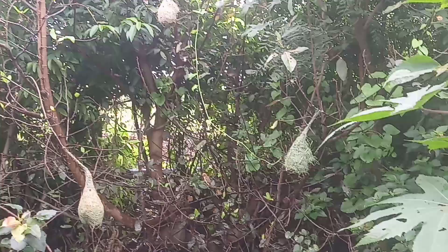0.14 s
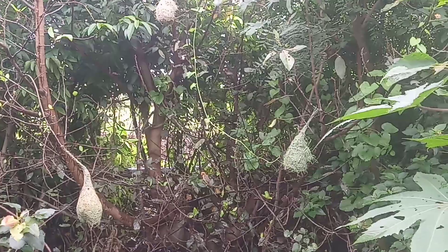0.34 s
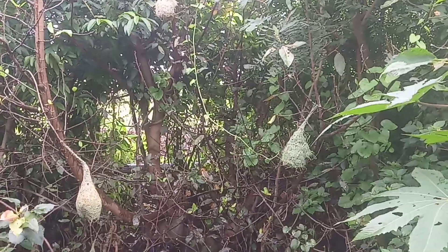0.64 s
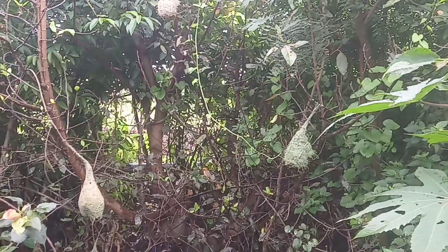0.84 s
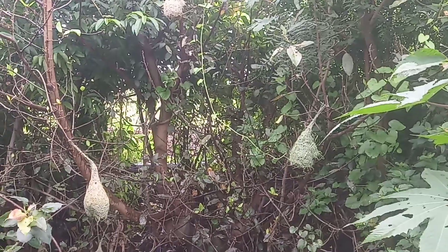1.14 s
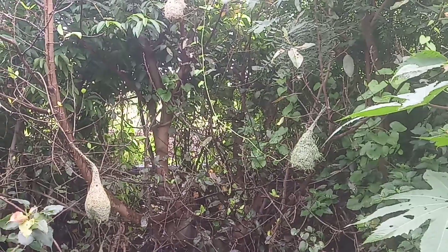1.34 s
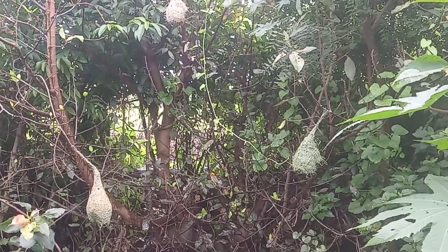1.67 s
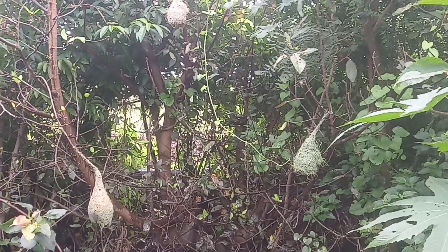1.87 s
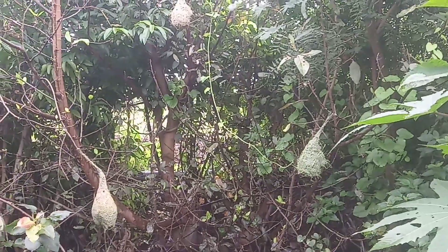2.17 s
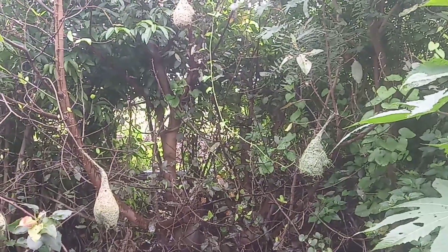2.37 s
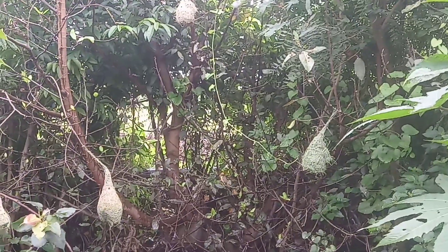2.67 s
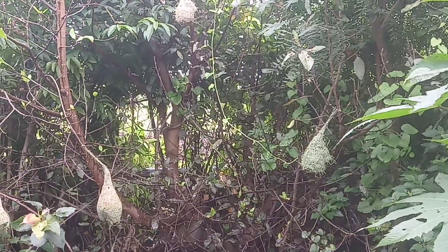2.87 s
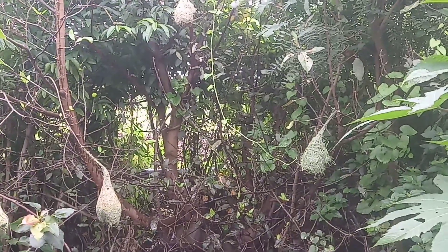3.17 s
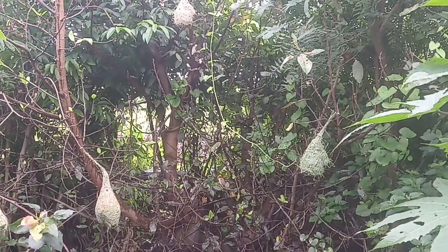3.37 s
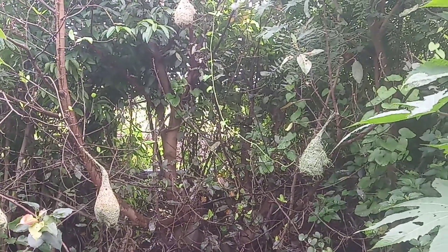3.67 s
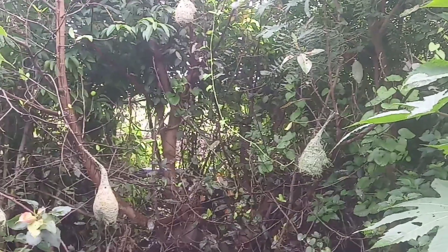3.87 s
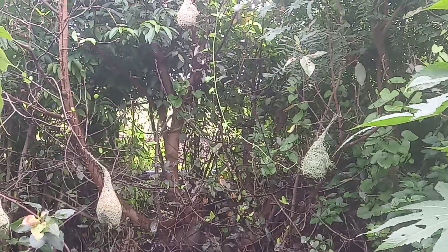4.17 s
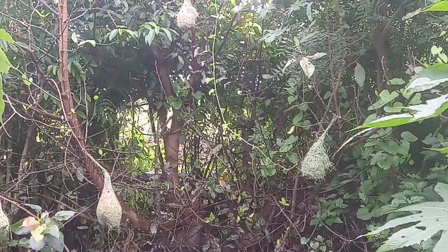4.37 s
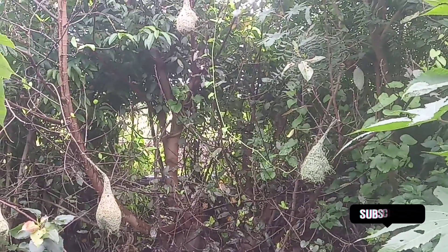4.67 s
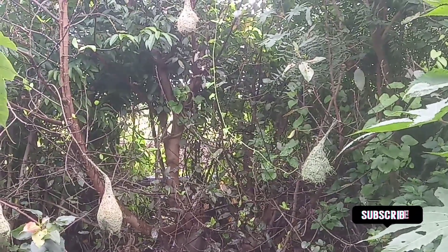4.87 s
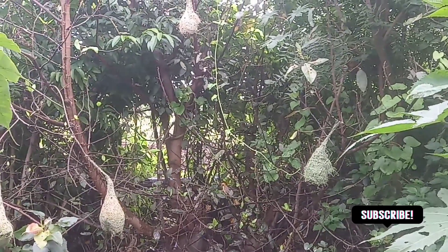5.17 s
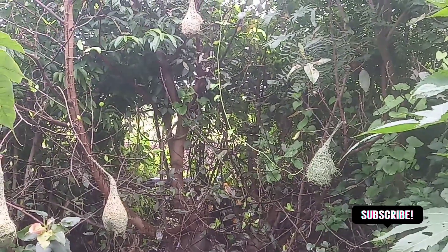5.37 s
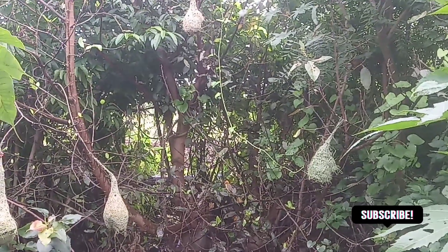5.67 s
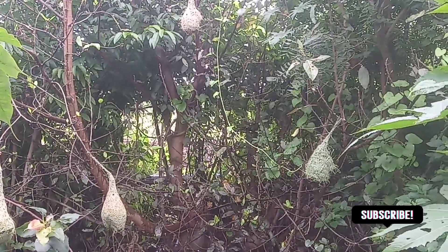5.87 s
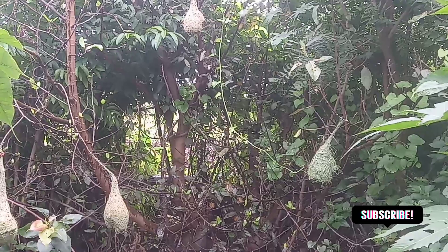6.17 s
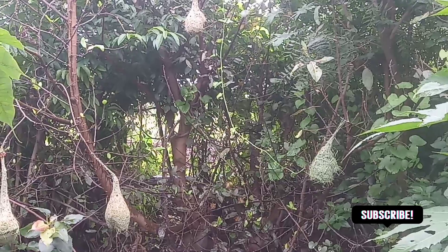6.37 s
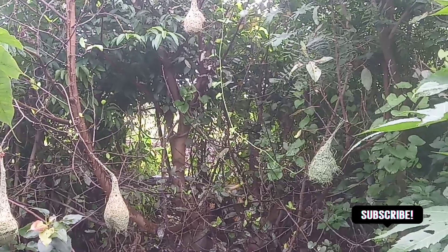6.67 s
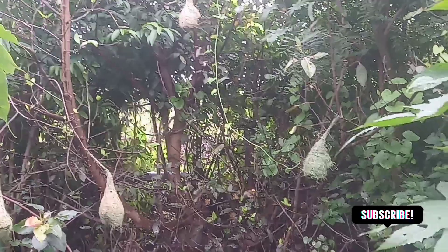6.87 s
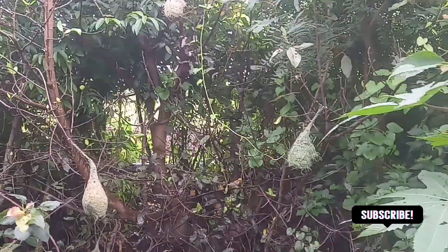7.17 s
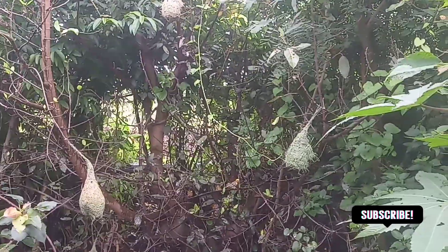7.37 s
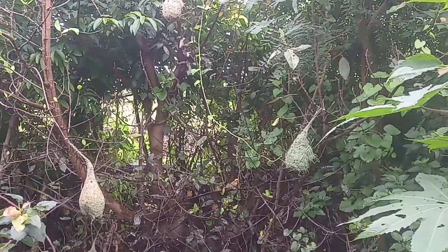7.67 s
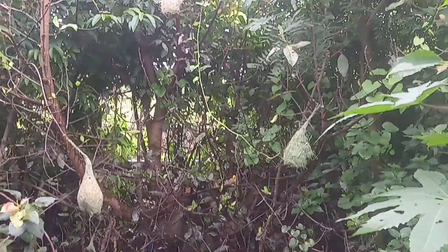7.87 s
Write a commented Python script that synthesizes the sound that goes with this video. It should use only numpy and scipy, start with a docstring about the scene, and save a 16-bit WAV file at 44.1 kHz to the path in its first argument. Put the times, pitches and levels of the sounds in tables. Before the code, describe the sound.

A leafy outdoor thicket with weaver birds, heard through a handheld mono recorder. High crickets trill in alternating bouts of about a third of a second, over constant thin cicada buzz, faint hiss and rumble. A close bird gives very short, bright chirps, flicking up then falling, some raspier: at 0, 0.2 and 0.5 seconds, then 1.5, 2.1, 3.0, 3.7, a pair near 4.8, 5.6, and a cluster at 7.1, 7.3 and 7.6. A lower nasal neighbour scolds near 1.1, 3.5, 5.5 and 6.7. Soft rising notes repeat about four times a second at 0.1-0.9, 3.2-4.8 and 6.6-8, each series climbing. Distant whistles glide throughout; a faint flock haze is strongest at first. Leaves scatter calls briefly. A soft low bump comes at 1.3, a small click-like knock at 4.3.

```python
"""In a thicket of weaver birds: one bird close to the microphone chirps, sweeping up and falling with buzzy partials.
A neighbour scolds in a lower nasal voice, one bird repeats a rising note; others whistle far off as gliding sines,
and a far flock is a haze of tiny notes. Two crickets in bouts and steady cicadas are banded, throbbing noise.
Leaves and trunks scatter the bird calls into a short tail of decaying noise; rumble and hiss lie under it all,
and the hand-held recorder is knocked a few times, each knock a brief ringing sine."""
import sys
import numpy as np
from scipy import signal
from scipy.fft import rfft, irfft
from scipy.io import wavfile
from scipy.ndimage import uniform_filter1d, map_coordinates

SR = 44100
rng = np.random.default_rng(int(sys.argv[2]) if len(sys.argv) > 2 else 0)


def master(y):
    """Save y as 16-bit WAV."""
    cut = np.clip(np.atleast_2d(y).T, -1, 1)
    pcm = np.round(cut * 32767)  # scale
    wavfile.write(sys.argv[1], SR, pcm.astype(np.int16))


N = 353682

# Close bird's chirps: top_s, top_hz, fall_s, level_db (ahead of the throat), start_db (at the top, against level);
# first_db, third_db, upper_db (4th-5th partial), shrill_db (6th and up), all against the throat;
# rasp_db, echo_db (sent to the leaves, against the direct call)
CHIRPS = [(.006, 2122, .049, -35, -4, 7, 0.5, 2.5, -13, -13, -2),
          (.199, 2121, 0.057, -50, 0.5, 9.8, 9, 8, -4, -6, 6),
          (.489, 2062, 0.064, -36.5, 3, 4.6, -2, 3, -1.5, -33, 2.5),
          (1.509, 2088, 0.054, -47.5, -3.5, 9.9, 8, -2, 4, -5.5, 2),
          (2.062, 2026, .064, -40.5, -1.5, 7.9, 0, 3.5, -2, -24, 2),
          (2.953, 2069, 0.058, -36.5, -0.5, 4.1, 2, -1.5, 0, -28, 0),
          (3.704, 2036, 0.059, -39, -2.5, 7.3, 2, 2.5, 2.5, -27, 1.5),
          (4.716, 2102, 0.066, -44.5, 2, 6.5, 3, 3, 0, -22, 8),
          (4.857, 2153, .06, -53, 1, 13, 6.5, 7.5, -7, -12, 7),
          (5.645, 2107, .066, -39.5, -0.5, 7.3, 2.5, 5, 0, -28, 3.5),
          (7.116, 2142, 0.063, -35.5, -1.5, 3.5, 5.5, -1.5, 5, -16.5, 1.5),
          (7.322, 2057, .052, -40, -4, 11.2, 2, 2, 0, -15, 1.5),
          (7.56, 2074, .06, -38.5, -4.5, 6.6, 3, 6.5, -4, -32, 3)]
# Close bird's throat gain: pitch_hz, gain_db
CHIRP_THROAT = [(1000, -62), (1450, -45), (2050, -22), (2900, -5.5), (4150, 1.5), (5200, -7), (6200, -14.5),
                (8300, -32.5), (10400, -27), (12500, -36.5), (15500, -55.5)]
# Neighbour's scolds: start_s, held_hz, length_s, opening_db, held_db, last_db (all ahead of the throat)
SCOLDS = [(1.11, 1075, 0.14, -60, -59.5, -58), (3.531, 1049, 0.147, -60, -60, -56),
          (5.479, 1052, .15, -67.5, -63, -56.5), (6.709, 1053, 0.15, -61.5, -60, -58)]
# Pitch course of a scold: share_of_length [0-1], pitch_ratio [to held_hz]
SCOLD_GLIDE = [(0, 1.33), (.08, 1.31), (.13, 1.05), (.3, 1.01), (.62, .98), (.78, .9), (1, .75)]
# Neighbour's throat gain: pitch_hz, gain_db
SCOLD_THROAT = [(1050, -37.5), (1500, -28.5), (2100, -0.5), (2800, -5.5), (3200, 4), (4300, 2.5),
                (5400, -16), (8000, -29.5)]
# Repeated rising note: start_s, length_s, middle_hz, level_db (before the wavering)
REPEATS = [(.106, 0.11, 2300, -80.5), (0.343, 0.12, 2366, -73.5), (0.624, .09, 2480, -76.5),
           (.871, 0.082, 2578, -70.5), (3.164, 0.071, 2130, -75), (3.42, .11, 2190, -76.5),
           (3.72, 0.078, 2260, -71), (3.969, 0.1, 2320, -70), (4.228, 0.11, 2470, -69.5),
           (4.495, 0.1, 2584, -70.5), (4.748, 0.12, 2800, -62.5), (6.637, 0.1, 2160, -81),
           (6.912, 0.082, 2230, -71.5), (7.185, 0.08, 2270, -68.5), (7.437, 0.12, 2270, -68),
           (7.695, 0.056, 2315, -66), (7.946, .078, 2380, -85.5)]
# Distant whistles: start_s, length_s, early_hz, middle_hz, late_hz, level_db (before the wavering)
WHISTLES = [(.699, 0.11, 3290, 3130, 3000, -84), (0.746, 0.094, 3550, 3690, 3550, -81.5),
            (0.923, 0.085, 3800, 3710, 3660, -73.5), (1.105, 0.46, 1400, 1676, 1486, -76.5),
            (1.298, .16, 1980, 2050, 2070, -77), (1.365, 0.25, 2755, 2540, 2630, -82),
            (1.837, 0.37, 1357, 1526, 1364, -81.5), (1.98, .16, 2290, 2320, 2290, -76),
            (2.225, 0.036, 2460, 2525, 2480, -76.5), (2.36, 0.046, 2490, 2450, 2490, -80.5),
            (2.68, 0.27, 2024, 1982, 1953, -78), (2.77, 0.22, 790, 780, 790, -92),
            (3.034, 0.079, 2750, 2710, 2620, -86), (3.352, 0.32, 1974, 2056, 2040, -72),
            (4.003, 0.1, 2110, 1930, 1980, -88), (4.37, 0.067, 2570, 2660, 2640, -84),
            (4.374, 0.11, 2020, 1994, 1974, -79.5), (5.144, 0.092, 3200, 3260, 3280, -83),
            (5.172, .13, 1980, 1980, 1950, -89), (5.23, .1, 2620, 2610, 2600, -88),
            (5.247, 0.13, 3980, 4150, 3900, -73), (5.288, .048, 3450, 3565, 3620, -73.5),
            (5.717, 0.14, 2015, 1990, 1910, -81), (5.726, 0.19, 1597, 1666, 1600, -89.5),
            (6.04, 0.095, 2180, 1940, 1780, -87), (6.2, .087, 1830, 1770, 1836, -88),
            (6.308, .054, 4000, 4070, 3870, -86), (6.9, 0.078, 3210, 3230, 3120, -76)]
# Loudness course of the far flock, before its shares in the mix: time_s, level_db
FLOCK_COURSE = [(0, -72), (.3, -74.5), (.7, -77), (.86, -90), (.95, -77), (1.47, -80), (1.82, -92),
                (2.4, -101), (2.6, -90.5), (3.2, -98), (4.15, -94.5), (5.05, -88), (5.35, -87),
                (5.45, -95.5), (6.18, -91), (6.58, -87.5), (7.0, -86), (8.02, -90)]
# Bouts of the lower and the higher cricket: start_s, length_s, level_db (before the wing bands' own levels)
LOW_BOUTS = [(0, 0.48, -63.5), (1.15, 0.32, -64.5), (1.82, .36, -65.5), (2.58, 0.29, -66), (3.3, .3, -64.5),
             (3.88, .31, -65.5), (4.55, 0.39, -65.5), (5.17, 0.28, -64), (5.76, 0.271, -64.5),
             (6.47, 0.33, -65), (7.15, .33, -63.5), (7.82, 0.33, -65.5)]
HIGH_BOUTS = [(.1, 0.28, -61), (.55, 0.39, -71), (.89, 0.32, -61.5), (1.5, .32, -63.5), (2.21, 0.31, -63),
              (2.91, 0.35, -62.5), (3.6, 0.3, -61), (4.24, .35, -63.5), (4.95, .32, -62), (5.52, 0.37, -63),
              (6.24, 0.36, -62), (6.9, 0.37, -61.5), (7.58, 0.35, -62)]
# Wing bands of each cricket: pitch_hz, width_hz, strokes_per_s, level_db, start_db (at bout start, against level)
LOW_WINGS = [(4710, 140, 51, -2, -3), (4973, 210, 51, -3, -3), (4420, 130, 61, -18, -6)]
HIGH_WINGS = [(4924, 120, 62, -4.5, 0.5), (5080, 130, 57, -2.5, -13.5), (5410, 200, 87, -14.5, -14)]
# Cicada bands: pitch_hz, width_hz, level_db (before the swelling)
CICADAS = [(5874, 300, -68), (6186, 323, -64), (6493, 398, -64), (6760, 400, -75)]
# Knocks on the recorder: start_s, ring_hz (once settled), t60_s, peak_db
KNOCKS = [(0.271, 75.3, 0.35, -63), (.56, 78, 0.14, -71), (1.268, 68, 0.14, -49),
          (4.3333, 570, 0.012, -40.5), (4.334, 3470, .01, -59), (7.739, 590, 0.013, -63)]
# Shape of the rumble and hiss, overall level set by AIR_DB: pitch_hz, gain_db
AIR_SHAPE = [(20, -16.5), (40, -23), (68, -3.5), (130, -6), (250, -14.5), (450, -22.5), (1000, -27.5),
             (2000, -26), (4000, -27), (5300, -31), (7300, -27.5), (9000, -31.5), (12000, -33),
             (16000, -31)]
# Fade of the third, fourth, fifth and higher partials: multiples of OFF_TOP_DB
FADE_STEPS = (2.22, 3.2, 2.5, 3.2)

# Close bird
SWEEP_S, SWEEP_FROM_HZ = .024, 900
SWEEP_DB = -22  # start of the sweep against its level
USUAL_DB, SWEEP_TOP_DB, SWEEP_FOLLOWS = -40, -48.5, 0.4  # sweep of a chirp at USUAL_DB; dB per dB of level
SWEEP_RASP = .35  # depth of the rasp in the sweep
SWEEP_THIN = 5.5  # the first partial is faint low in the sweep (multiple of its fade)
FALL_BEND = 3.2  # power of the steepening fall
OFF_TOP_DB = -16.5  # fade per octave below the top, taken in multiples; a fifth as much during the sweep
LAST_HZ, LAST_HZ_PER_RASP = 1456, 295  # a raspy chirp breaks off higher
LATE_DB, LATE_DB_PER_RASP = -8.5, 17  # end of the fall against the level; raspy chirps hold on
RASP_HZ = 615  # cutoff of the noise that shakes the partials
# Repeated note: above EASY_HZ it arches over (Hz per Hz)
RISE_IN_HZ, RISE_OUT_HZ, EASY_HZ, ARCH_IN, ARCH_OUT = 78, 70, 2278, .25, .55
FLOCK_LOW_HZ, FLOCK_HIGH_HZ = 2872, 4600
# Insects
SWELL_SHARE, BOUT_EDGE_S = 0.56, 0.066  # share of a bout spent swelling; length of its edges
CHORUS_DB = -83.5  # far crickets, heard between bouts
START_FLAT = .012  # a bout starts this share under its pitch and glides up as it swells
OVERTONE_HZ, OVERTONE_WIDTH_HZ, OVERTONE_DB = 9454, 440, -85
# Place and recorder
THICKET_T60_S, THICKET_DB, THICKET_DULL_HZ = .2, -2.5, 6500
FAR_TREES_T60_S, FAR_TREES_DB = 0.39, -26.5
AIR_DB = -78.5
TOP_HZ = 15750  # top of the recorder's range


def undb(db):
    """Decibels to gain."""
    return 10 ** (np.asarray(db) / 20)


def level(x, db):
    """Scale to an RMS level."""
    return x * undb(db) / np.sqrt(np.mean(x ** 2))


def colour(table, hz):
    """Gain of a pitch_hz, gain_db table, read along log frequency."""
    table_hz, table_db = np.transpose(table)
    return undb(np.interp(np.log(hz), np.log(table_hz), table_db))


def lowpass(x, order, hz):
    """Remove the treble above a cutoff."""
    return signal.sosfilt(signal.butter(order, hz, fs=SR, output="sos"), x)


def band(x, hz, width_hz):
    """Steep resonance."""
    edges = [hz - width_hz / 2, hz + width_hz / 2]
    return signal.sosfilt(signal.butter(4, edges, "band", fs=SR, output="sos"), x)


def walk(rate):
    """Random drift of RMS 1, from twice-smoothed steps at `rate` per second."""
    k = int(SR / rate)
    steps = np.repeat(rng.standard_normal(N // k + 1), k)
    return level(uniform_filter1d(uniform_filter1d(steps, k), k)[:N], 0)


def add(track, start, sound):
    """Place a sound on a track, trimmed at both ends of it."""
    i = int(start * SR)
    sound = sound[max(-i, 0):N - i]
    track[max(i, 0):max(i, 0) + len(sound)] += sound


def glide_sine(hz):
    """Sine that follows a pitch curve."""
    return np.sin(2 * np.pi * np.cumsum(hz) / SR)


def voice(hz, throat, partial_db, rasp, rasp_climb=0.43):
    """Partials of a gliding pitch, weighted by the throat; rasp shakes their strength and spreads them into noise."""
    out = 0
    for k, db in enumerate(partial_db, 1):
        shake = level(lowpass(rng.standard_normal(len(hz)), 4, RASP_HZ), 0)
        roughness = 1 + rasp * (k - 1) ** rasp_climb * shake  # the first partial stays smooth when k - 1 is 0
        gain = colour(throat, k * hz) * undb(db) * (k * hz < TOP_HZ)
        out = out + gain * roughness * glide_sine(k * hz)
    return np.sqrt(2) * out


def chirps():
    """Close bird: a quick sweep up, a held top, a steepening fall; returns direct sound and what goes to the leaves."""
    near, far = np.zeros(N), np.zeros(N)
    for top_s, top, fall, middle, start_db, first, third, upper, shrill, rasp_db, echo_db in CHIRPS:
        last = LAST_HZ + LAST_HZ_PER_RASP * undb(rasp_db)
        late = middle + LATE_DB + LATE_DB_PER_RASP * undb(rasp_db)
        sweep = SWEEP_TOP_DB + SWEEP_FOLLOWS * (middle - USUAL_DB)
        t = np.arange(-SWEEP_S, fall + 0.0029, 1 / SR)
        rise = top - (top - SWEEP_FROM_HZ) * np.clip(-t / SWEEP_S, 0, 1) ** 1.1
        # the top sags slowly before it breaks away
        u = np.clip(t / fall, 0, 1)
        hz = rise - (top - last) * (.12 * u + .88 * u ** FALL_BEND)
        db = np.interp(t, [-SWEEP_S, -.019, -.003, .005, 0.54 * fall, 0.98 * fall, fall + 0.00093],
                       [sweep + SWEEP_DB, sweep - 4, sweep + 4, middle + start_db, middle, late, late - 25])
        fade = OFF_TOP_DB * np.log2(top / hz) * np.where(t > 0, 1, .2)
        # the first partial gains through the fall, while the third and up fade
        first_db = first - fade * np.where(t > 0, 1, -SWEEP_THIN)
        middle_dbs = [base + step * fade for base, step in zip([third, upper, upper], FADE_STEPS)]
        shrill_dbs = [shrill + FADE_STEPS[3] * fade] * 3
        rasp = np.interp(t, [-.005, .002], [SWEEP_RASP, undb(rasp_db)])
        call = undb(db) * voice(hz, CHIRP_THROAT, [first_db, 0, *middle_dbs, *shrill_dbs], rasp)
        add(near, top_s - SWEEP_S, call)
        add(far, top_s - SWEEP_S, undb(echo_db) * call)
    return near, far


def scolds():
    """Neighbour's lower, nasal calls: a harsh high opening, a held note, a droop."""
    out = np.zeros(N)
    for start, held, length, opening, steady, last in SCOLDS:
        u = np.arange(0, length, 1 / SR) / length
        hz = held * np.interp(u, *np.transpose(SCOLD_GLIDE))
        db = np.interp(u, [0, .02, .12, .25, .55, .92, 1],
                       [opening - 25, opening, opening - 6, steady - 3, steady, last, last - 20])
        rasp = np.interp(u, [0, .15, .3, 1], [.3, .25, .1, .08])
        # only the third partial carries through the droop
        droop = np.clip(1 - hz / held, 0, 1)
        upper = -6 * np.minimum(u * 5, 1) - 90 * droop
        partials = [-40 * droop, -40 * droop, 20 * droop] + [upper] * 3
        add(out, start, undb(db) * voice(hz, SCOLD_THROAT, partials, rasp, rasp_climb=1.4))
    return out


def repeats():
    """The repeated note as whistle rows: it rises, and arches over when pitched high."""
    start, length, hz, db = np.transpose(REPEATS)
    strain = np.maximum(hz - EASY_HZ, 0)
    early = hz - RISE_IN_HZ - ARCH_IN * strain
    late = hz + RISE_OUT_HZ - ARCH_OUT * strain
    return list(zip(start, length, early, hz, late, db))


def whistles():
    """Pure notes on an arched glide, wavering on the way through the leaves; high notes break up more."""
    low, high = np.zeros(N), np.zeros(N)
    for start, length, early, middle, late, db in WHISTLES + repeats():
        u = np.arange(0, length, 1 / SR) / length
        v = np.clip((u - .5) / .35, -1.2, 1.2)
        # parabola through the early, middle and late pitch
        hz = middle + v * (late - early) / 2 + v ** 2 * ((late + early) / 2 - middle)
        note = undb(db) * np.sqrt(2) * np.sin(np.pi * u) ** 0.6 * glide_sine(hz)
        add(high if middle > 3000 else low, start, note)
    return low * undb(4 * walk(90)) + high * walk(250)


def flock(count=500):
    """Many faint 25 ms notes gliding either way, too far off to tell apart."""
    out = np.zeros(N)
    for when, pitch, glide, size in rng.random((count, 4)):
        u = np.arange(0, .025, 1 / SR) / .025
        hz = FLOCK_LOW_HZ + (FLOCK_HIGH_HZ - FLOCK_LOW_HZ) * pitch + 500 * (glide - .6) * u
        add(out, when * N / SR, undb(-14 * size) * np.sin(np.pi * u) * glide_sine(hz))
    return level(out, 0) * undb(np.interp(np.arange(N) / SR, *np.transpose(FLOCK_COURSE)))


def strokes(rate, depth):
    """Scraping noise that throbs once per wing stroke, at a drifting rate."""
    return rng.standard_normal(N) * (1 + depth * glide_sine(rate * (1 + .08 * walk(12))))


def cricket(bouts, wings):
    """Each bout swells and glides up, holds, and dies away; every wing band swells by its own amount."""
    t, on, early = np.arange(N) / SR, np.zeros(N), np.ones(N)
    for start, length, db in bouts:
        edge = np.minimum(t - start, start + length - t) / BOUT_EDGE_S
        on += undb(db) * np.clip(edge + .5, 0, 1) ** 2
        unswelled = np.clip(1 - (t - start) / (SWELL_SHARE * length), 0, 1)
        early = np.where(t >= start - BOUT_EDGE_S, unswelled, early)
    # reading the scrape slower early in a bout lowers its pitch
    pace = np.cumsum(1 - START_FLAT * early)
    sound = 0
    for hz, width, rate, db, start_db in wings:
        scrape = map_coordinates(band(strokes(rate, .35), hz, width), [pace])
        sound = sound + (on * undb(start_db * early) + undb(CHORUS_DB)) * level(scrape, db)
    return sound, on


def crickets():
    """Two crickets in bouts, with a thin overtone about an octave up that follows their effort."""
    low, low_on = cricket(LOW_BOUTS, LOW_WINGS)
    high, high_on = cricket(HIGH_BOUTS, HIGH_WINGS)
    effort = level((low_on + 0.21 * high_on + undb(CHORUS_DB)) ** 0.21, OVERTONE_DB)
    overtone = level(band(strokes(50, 0.31), OVERTONE_HZ, OVERTONE_WIDTH_HZ), 0)
    return low + high + effort * overtone


def cicadas():
    """Steady chorus: bands of fast-throbbing noise that swell slightly together and each alone."""
    out = np.zeros(N)
    swell_db = 0.52 * walk(1.1)
    for k, (hz, width, db) in enumerate(CICADAS):
        buzz = level(band(strokes(188 + 13 * k, 0.77), hz, width), db)
        out += undb(swell_db + 1.5 * walk(11)) * buzz
    return out


def thicket(x):
    """Dense scatter off leaves, then a faint longer tail from trees further off; the treble dies sooner."""
    t = np.arange(0, .5, 1 / SR)
    noise = rng.standard_normal(len(t))
    dull = lowpass(noise, 2, THICKET_DULL_HZ)
    treble = (noise - dull) * undb(-60 * t / 2.0)
    decay = undb(-60 * t / THICKET_T60_S) + undb(FAR_TREES_DB - 60 * t / FAR_TREES_T60_S)
    tail = (dull + treble) * decay * np.minimum(t / 0.0053, 1)
    return signal.fftconvolve(x, tail * undb(THICKET_DB) / np.sqrt(np.sum(tail ** 2)))[:N]


def knocks():
    """Each knock rings the recorder's body briefly, sharp in pitch at first."""
    out = np.zeros(N)
    for start, hz, t60, db in KNOCKS:
        t = np.arange(0, t60, 1 / SR)
        turns = t * hz
        ring = np.sin(2 * np.pi * (turns + 0.44 * (1 - np.exp(-turns / 0.35))))
        onset = np.sin(np.pi / 2 * np.minimum(turns * 1.6, 1)) ** 2
        add(out, start, undb(db - 60 * t / t60) * ring * onset)
    return out


def air():
    """Distant rumble and hiss: noise shaped in frequency, its level drifting a little."""
    hz = np.maximum(np.arange(N // 2 + 1) * SR / N, 1)
    noise = irfft(rfft(rng.standard_normal(N)) * colour(AIR_SHAPE, hz), N)
    return level(noise, AIR_DB) * undb(0.49 * walk(3.4))


def scene():
    """Direct bird calls, their scatter off the thicket, insects, knocks and air, in one channel."""
    near, far = chirps()
    neighbour, distant, chatter = scolds(), whistles(), flock()
    leaves = thicket(far + undb(2.0) * neighbour + undb(-2.5) * distant + undb(2.0) * chatter)
    birds = near + neighbour + distant + undb(-8) * chatter + leaves
    return (birds + crickets() + cicadas() + knocks() + air())[None]


def record(dry):
    """The recorder cuts the top with a steep low-pass."""
    return signal.sosfilt(signal.ellip(10, .2, 60, TOP_HZ, fs=SR, output="sos"), dry)


dry = scene()
out = record(dry)
master(out)
```